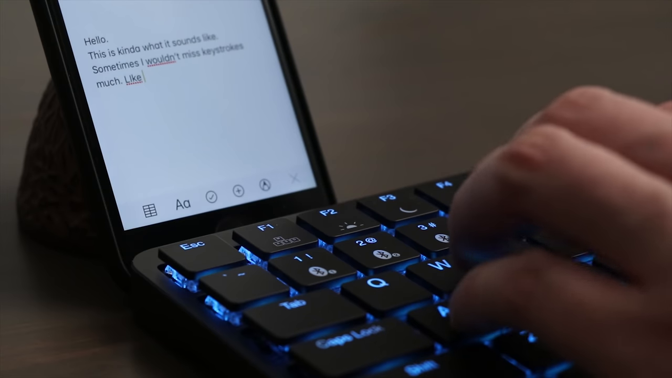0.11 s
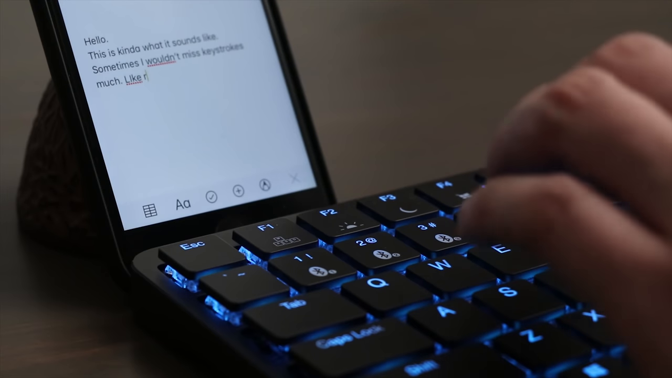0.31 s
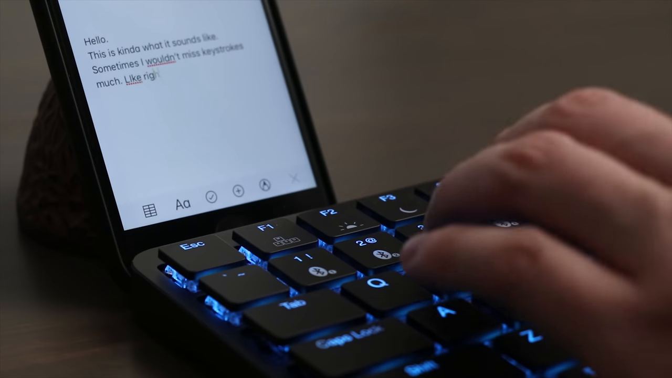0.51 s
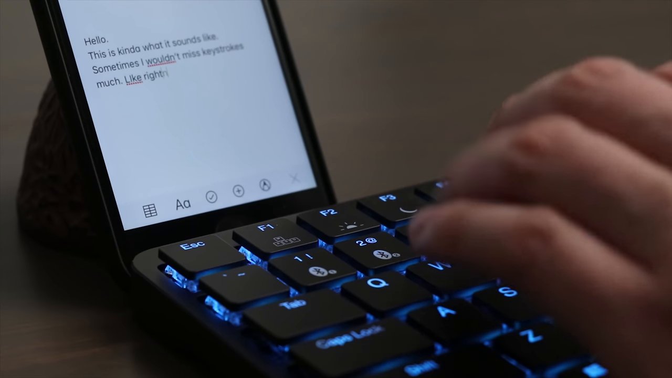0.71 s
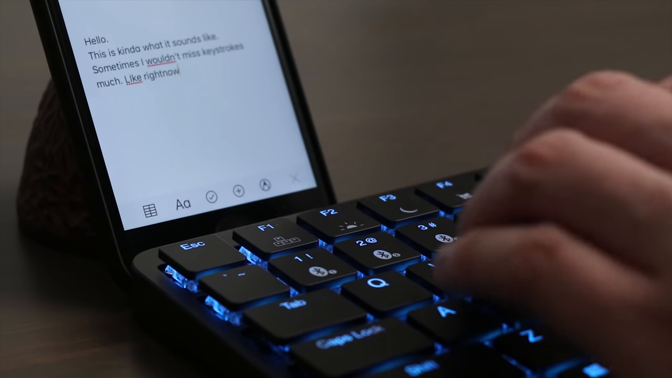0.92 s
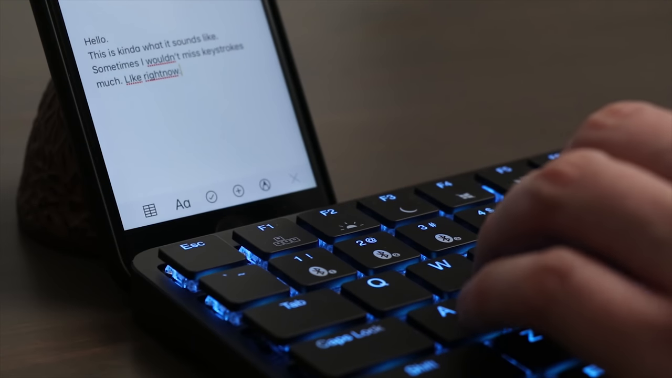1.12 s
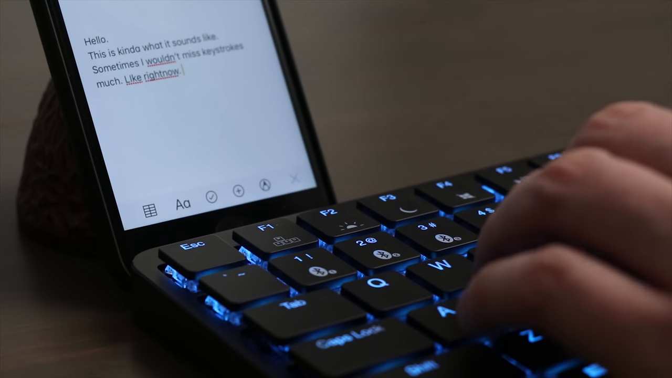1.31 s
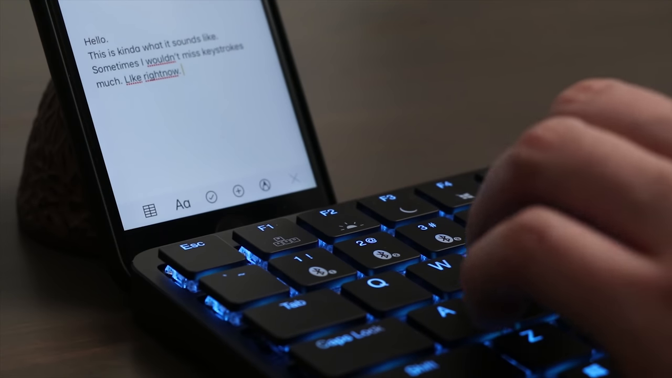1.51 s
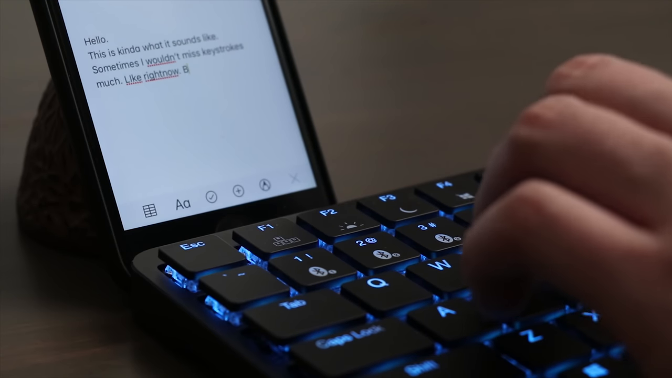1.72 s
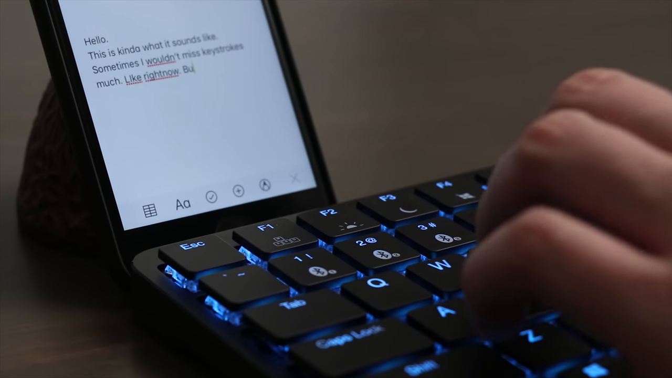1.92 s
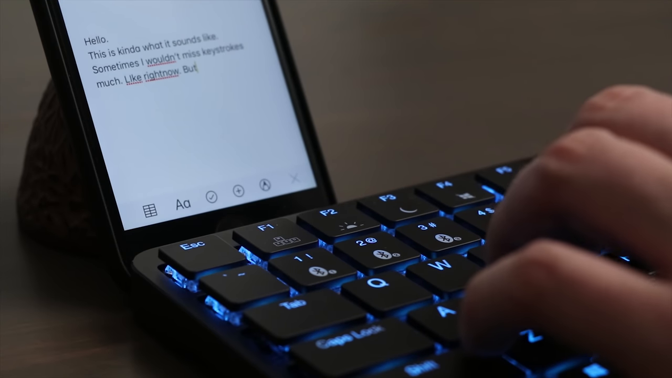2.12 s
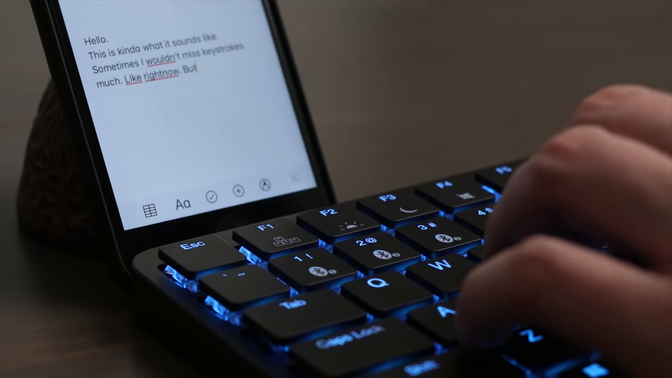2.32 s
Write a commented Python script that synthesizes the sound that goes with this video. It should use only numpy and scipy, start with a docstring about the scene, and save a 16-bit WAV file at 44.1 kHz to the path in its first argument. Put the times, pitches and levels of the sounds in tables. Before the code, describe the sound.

Mechanical keyboard typing up close, a dense burst of bright clicks, a pause, then sparser strokes

```python
"""Two bursts of typing on a clicky keyboard

A small mechanical keyboard stands on a wooden desk, close by in a quiet room. Switches give bright clicks
(shaped noise bursts), mostly followed within milliseconds by a keycap clack and the answer of the case.
Many strokes thump the desk and a few leave a spring ringing faintly: both are made of dying sine waves.
Reflections and a short room tail follow the keys, over a steady hush of rumble, hums and hiss."""
import sys
import numpy as np
from scipy import signal
from scipy.fft import rfft, irfft
from scipy.io import wavfile
from scipy.ndimage import uniform_filter1d

SR = 44100
rng = np.random.default_rng(int(sys.argv[2]) if len(sys.argv) > 2 else 0)


def master(y):
    """Save y as 16-bit WAV."""
    cut = np.clip(np.atleast_2d(y).T, -1, 1)
    pcm = np.round(cut * 32767)  # scale
    wavfile.write(sys.argv[1], SR, pcm.astype(np.int16))


N = 110250  # 2.5 s

# every short burst: its rise, the smoothing of its own spectrum, and the random bumps added to it
ATTACK_MS, GRAIN_HZ, UNEVEN_DB, UNEVEN_HZ = 0.15, 906, 2.5, 452
CAP_WIDTH_HZ, CASE_WIDTH_HZ, CLICK_WIDTH_HZ = 890, 300, 560
CASE_RING_TIMES = 1.86  # the case's decay time, as a multiple of the cap's
RATTLE_DB, RATTLE_AFTER_S, RATTLE_SPREAD_S, RATTLE_DECAY_MS = -22.5, 0.005, 0.013, 0.64
NEAR_T60_S, NEAR_DB, NEAR_DELAY_S, ROOM_DELAY_S = 0.068, -17.5, 0.006, 0.0083
KNOCK_OCTAVES, DESK_RISE_S, DESK_LOW_CUT_HZ = 0.91, 0.0027, 46.4
BOOM_HZ, BOOM_T60_S, BOOM_RISE_S = 78, 0.61, 0.00825
OVERTONE, OVERTONE_DB = 2.4, -21.5  # spring overtone: multiple of the main pitch, and level against it
HUSH_DB, RUMBLE_SIDE_DB, MIC_HISS_DB = -66, -21.5, -79.5
CUTOFF_HZ = 16300


def amp(db):
    """Turns decibels into a gain."""
    return 10 ** (np.asarray(db) / 20)


def read(points, hz):
    """Reads a (frequency, value) table between its points, on a log-frequency axis."""
    point_hz, value = np.transpose(points)
    return np.interp(np.log(hz + 1), np.log(np.abs(point_hz) + 1), value)


def unit(x):
    """Scales to an rms of 1."""
    return x / np.sqrt(np.mean(x ** 2) + 1e-30)


def add(mix, start_s, sound):
    """Mixes a sound in at a time, cutting what runs past the end."""
    part = mix[max(round(start_s * SR), 0):][:len(sound)]
    part += sound[:len(part)]


def bell(hz, centre_hz, width_hz):
    """Gain of a resonance: 1 at its centre, one half a width away."""
    return 1 / (1 + ((hz - centre_hz) / width_hz) ** 2)


def die_away(t, t60_s):
    """A ring loses the same share of its level each moment: 60 dB in t60_s."""
    return np.exp(-np.log(1000) * t / t60_s)


def hush():
    """Low room rumble, faint hums, a thin whine and even hiss, all made of noise shaped by frequency."""
    # background spectrum before scaling to HUSH_DB: pitch_hz, level_db (per Hz)
    hush_spectrum = [(12, -28.5), (20, 10), (86, -12), (127, -6), (204, -6.5), (241, -0.5), (270, -12.5),
                     (357, -10), (485, -15), (590, -16), (1000, -20), (1090, -21), (3740, -24.5),
                     (6180, -25), (16000, -26)]
    # faint steady hums and a thin whine: pitch_hz, width_hz, level_db
    hum_bands = [(185, 8, -78.5), (256, 8, -93.5), (6300, 250, -86.5)]
    hz = np.fft.rfftfreq(N, 1 / SR)

    def noise(shape):
        return unit(irfft(rfft(rng.standard_normal(N)) * shape, N))

    out = amp(HUSH_DB) * noise(amp(read(hush_spectrum, hz)))
    for pitch_hz, width_hz, level_db in hum_bands:
        out += amp(level_db) * noise(bell(hz, pitch_hz, width_hz))
    return out


def impact(parts, decay_ms, size=2048):
    """A hard knock is a dense, fast-dying ring; parts(hz) lists its (dB over 2 ms, spectral shape) pairs."""
    ms = np.arange(size) * 1000 / SR
    hz = abs(np.fft.fftfreq(size, 1 / SR))
    envelope = (1 - np.exp(-ms / ATTACK_MS)) * np.exp(-ms / decay_ms)
    burst = np.fft.fft(rng.standard_normal(size) * envelope)
    grain_bins = max(int(GRAIN_HZ * size / SR), 3)
    own_power = uniform_filter1d(abs(burst) ** 2, grain_bins, mode="wrap")
    bumps = np.interp(hz / UNEVEN_HZ, np.arange(size), rng.standard_normal(size))
    uneven = amp(UNEVEN_DB * bumps)
    power = sum((amp(db) * unit(shape * uneven)) ** 2 for db, shape in parts(hz))
    power = power * 0.002 * SR  # as much energy as 2 ms at the given level
    # a minimum-phase filter gives the burst this spectrum and keeps its start sharp
    log_gain = 0.5 * np.log(power / own_power + 1e-16)
    colour = np.exp(np.conj(signal.hilbert(log_gain)))
    return np.fft.ifft(burst * colour).real


def keycaps():
    """Plastic meets its stop: cap and hard edge sound, the hollow case rings longer, the cap rattles once."""
    # keycap clacks: start_s, cap_db, cap_hz, case_db, case_hz, edge_db, decay_ms
    clack_strokes = [(0.235, -69, 3480, -49, 1480, -72, 2.2), (0.2387, -38.5, 3660, -52, 1520, -52, 2.3),
                     (0.251, -28.5, 3300, -34.5, 1600, -36, 1.8), (0.282, -38.5, 3360, -47, 1640, -62, 1.1),
                     (0.3041, -34, 2710, -44, 1390, -37, 2), (0.3124, -20, 2900, -38, 1270, -25, 1.75),
                     (0.3446, -56, 3260, -47, 1390, -45, 2.1), (0.3895, -40, 3400, -39.5, 1380, -32.5, 4.7),
                     (0.4033, -29, 2800, -40, 1320, -30, 1.46), (0.451, -37, 3300, -51, 1480, -41, 2.1),
                     (0.4672, -37.5, 2860, -47, 1500, -36.5, 2.6),
                     (.4850, -30.5, 2600, -29, 1540, -32, 2.06),
                     (0.5508, -36.5, 2970, -40.5, 1500, -63, 1.2),
                     (0.5584, -31.5, 2800, -42, 1390, -37.5, 2.3),
                     (.6450, -37.5, 2940, -39.5, 1290, -36, 3.1), (0.666, -36, 2970, -35, 1590, -43, 3.7),
                     (0.6851, -39, 3540, -49, 1486, -48, 2.4), (0.6864, -27, 2820, -38, 1430, -30, 3.5),
                     (.7330, -31.5, 3160, -41, 1440, -40, 1.4), (0.7368, -35, 2700, -42, 1520, -43, 6.1),
                     (0.7414, -26, 2820, -38.5, 1380, -32.5, 1.5), (0.8037, -35, 2720, -47, 1490, -48, 3.1),
                     (0.8182, -32.5, 3160, -43, 1570, -38, 1.1),
                     (0.831, -34.5, 3750, -43.5, 1330, -42, 1.6), (0.8739, -26, 2850, -35, 1770, -53, 1.5),
                     (0.88, -57, 2800, -40, 1040, -50, 1.4), (0.9055, -35, 2850, -35.5, 1620, -53, 2.4),
                     (0.9998, -43, 3280, -36, 1600, -31, 2.5), (1.0081, -33.5, 2900, -46, 1370, -38.5, 3),
                     (1.0545, -59, 2970, -50.5, 1370, -53, 2.5), (1.0756, -43, 3300, -32, 1360, -35.5, 1.9),
                     (1.087, -58, 3000, -50, 890, -45, 2.8), (1.114, -32, 3350, -38, 1490, -54, 2.2),
                     (1.1798, -54, 3000, -39, 1370, -45, 2.9),
                     (1.5611, -39.5, 3500, -50.5, 1500, -41.5, 2.8),
                     (1.5799, -44, 2880, -54.5, 1480, -43, 4.4), (1.6452, -41, 2880, -42, 1390, -44, 3.9),
                     (1.6731, -33, 3500, -36, 1780, -36.5, 1.3), (1.7134, -60, 3000, -44, 1720, -39, 1.9),
                     (1.754, -34, 2400, -38, 1500, -36.5, 2.1), (1.7657, -31, 2610, -54, 1390, -37, 0.94),
                     (1.8337, -44, 2500, -52, 1500, -56, 2.5), (1.8449, -27.5, 3270, -30, 1440, -40, 1.7),
                     (1.8945, -36, 2350, -43, 1560, -39, 2), (1.9787, -48, 3040, -44.5, 1232, -56, 3.2)]
    # hard edge, before scaling to edge_db: pitch_hz, level_db (per Hz)
    edge_spectrum = [(100, -6.5), (700, -14), (2000, -12.5), (3500, -1), (4300, -1.5), (5400, -4),
                     (6400, -8.5), (7700, -6.5), (8800, -6), (10200, -17), (12000, -12.5), (15000, -21.5),
                     (17000, -45)]
    # colour that the case gives to every clack: pitch_hz, gain_db
    shell_colour = [(100, -4), (800, 0), (1250, 1.5), (1600, 0), (1850, -3), (2150, 4), (2550, 5),
                    (3000, 1.5), (3400, 2.5), (4200, 2.5), (16000, 0)]
    out = np.zeros(N)

    def ring(hz, centre_hz, width_hz):
        less_bass = np.minimum(hz / centre_hz, 1)
        return bell(hz, centre_hz, width_hz) * less_bass * amp(read(shell_colour, hz))

    for start_s, cap_db, cap_hz, case_db, case_hz, edge_db, decay_ms in clack_strokes:
        def cap(hz):
            edge = amp(read(edge_spectrum, hz) + read(shell_colour, hz))
            return [(cap_db, ring(hz, cap_hz, CAP_WIDTH_HZ)), (edge_db, edge)]

        def case(hz):
            return [(case_db, ring(hz, case_hz, CASE_WIDTH_HZ))]

        add(out, start_s, impact(cap, decay_ms))
        add(out, start_s, impact(case, decay_ms * CASE_RING_TIMES))
        rattle_s = start_s + RATTLE_AFTER_S + RATTLE_SPREAD_S * rng.random()
        add(out, rattle_s, amp(RATTLE_DB) * impact(cap, RATTLE_DECAY_MS))
    return out


def scatter(x):
    """Quick reflections from desk, hands and screen: the sound is smeared by a short dying noise."""
    t = np.arange(SR // 8) / SR
    near = rng.standard_normal(len(t)) * (t > NEAR_DELAY_S) * die_away(t, NEAR_T60_S)
    return amp(NEAR_DB) * signal.fftconvolve(x, near / np.linalg.norm(near))[:N]


def room(x, size=128):
    """The small room stores the energy of each band and gives it back as a diffuse, dying hiss."""
    # how long each pitch lingers: pitch_hz, t60_s (time to fall 60 dB)
    room_decay = [(200, 0.6), (1300, 0.38), (2700, 0.35), (4500, 0.3), (8300, 0.33), (12000, .22),
                  (15000, 0.1)]
    # colour of the tail: pitch_hz, gain_db
    tail_colour = [(200, 9), (1300, -13.5), (2700, -18.5), (4500, -13), (6500, -10.5), (8300, -16.5),
                   (10000, -13.5), (15000, -14)]
    hz, when_s, bands = signal.stft(x, SR, nperseg=size)
    # share of the stored energy left after one time step (twice the rate, as energy is level squared)
    keep = np.exp(-2 * np.log(1000) * when_s[1] / read(room_decay, hz))
    energy = np.array([signal.lfilter([1 - k], [1, -k], abs(band) ** 2) for k, band in zip(keep, bands)])
    noise = signal.stft(rng.standard_normal(N), SR, nperseg=size)[2]
    field = noise / noise.std() * np.sqrt(energy) * amp(read(tail_colour, hz))[:, None]
    out = np.zeros(N)
    add(out, ROOM_DELAY_S, signal.istft(field, SR, nperseg=size)[1])
    return out


def desk():
    """Each thump knocks the desk modes around one pitch and sets its lowest mode booming."""
    # thumps: start_s, knock_db, centre_hz, boom_db
    thump_strokes = [(0.244, -49, 203, -56), (.312, -42, 178, -49.5), (0.39, -45, 435, -61),
                     (0.405, -51, 180, -55), (0.463, -67, 170, -54), (.485, -60, 250, -69),
                     (0.557, -48, 222, -50), (.667, -49, 390, -50), (0.69, -40.5, 235, -55.5),
                     (0.737, -51, 298, -60), (0.814, -52.5, 348, -68.5), (0.829, -44.5, 330, -69),
                     (0.903, -59, 480, -75), (1.001, -42.5, 320, -58.5), (1.012, -46, 220, -58),
                     (1.080, -42, 600, -64), (1.086, -42.5, 313, -58), (1.116, -46.5, 300, -70),
                     (1.179, -67, 276, -68.5), (1.565, -55.5, 200, -61.5), (1.673, -48.5, 410, -62),
                     (1.755, -45, 262, -51.5), (1.80, -60, 380, -66), (1.845, -58, 345, -74),
                     (1.892, -53, 386, -67)]
    # natural pitches of the desk: pitch_hz, level_db (against each other), t60_s
    desk_modes = [(125, -1.5, .13), (158, -2.5, 0.097), (194.4, -2, 0.1), (212, 0, 0.12), (250, -9, 0.11),
                  (305, -7, 0.13), (330, -1.5, 0.09), (408.4, -2.5, 0.091), (474, -5, .1), (520, -11, 0.17),
                  (634, -6.5, .07), (731, 2.5, .06)]
    out, t = np.zeros(N), np.arange(SR // 2) / SR
    hz, db, t60_s = np.transpose(desk_modes)[:, :, None]  # one row per mode
    boom = np.sin(2 * np.pi * BOOM_HZ * t) * die_away(t, BOOM_T60_S)
    boom = np.minimum(t / BOOM_RISE_S, 1) * boom
    for start_s, knock_db, centre_hz, boom_db in thump_strokes:
        weight = amp(db) * bell(np.log2(hz), np.log2(centre_hz), KNOCK_OCTAVES)
        modes = np.sin(2 * np.pi * (hz * t + rng.random(hz.shape))) * die_away(t, t60_s)
        knock = (weight * modes).sum(0) / np.linalg.norm(weight)
        knock = np.minimum(t / DESK_RISE_S, 1) * knock
        add(out, start_s, amp(knock_db) * knock + amp(boom_db) * boom)
    low_cut = signal.butter(2, DESK_LOW_CUT_HZ, "high", fs=SR, output="sos")
    return signal.sosfilt(low_cut, out)


def switches():
    """The click leaf snaps: a ring near 8 kHz, a treble splash and a little of the stem."""
    # switch clicks: start_s, ring_db, ring_hz, stem_db, treble_db, decay_ms
    click_strokes = [(0.2459, -28.5, 8470, -40.5, -34, 1.6), (0.309, -27, 8400, -37.5, -35.5, .8),
                     (.3869, -47, 9000, -48, -37.5, 1.3), (0.3993, -34, 7200, -34.5, -38, 0.7),
                     (0.4617, -32, 7750, -41, -36.5, 0.59), (.4834, -31.5, 7720, -37.5, -36, 2.7),
                     (0.5466, -37, 8000, -40.5, -40, 1), (0.5561, -38.5, 8700, -39.5, -35, 0.75),
                     (.6410, -35, 8430, -50, -35, 0.61), (0.6804, -34.5, 7860, -46, -38.5, 0.85),
                     (.7380, -80, 8400, -34, -38.5, 0.67), (0.8002, -31.5, 8370, -47, -39.5, 0.45),
                     (0.8274, -33, 8530, -37, -34.5, 1.2), (0.8706, -33.5, 8200, -35, -40.5, 2.6),
                     (0.903, -31.5, 8130, -39, -37.5, 1.7), (1.0054, -31, 8520, -34.5, -39, 0.58),
                     (1.0704, -37, 7860, -39, -41.5, 1.6), (1.0768, -34.5, 8600, -37.5, -43, 0.58),
                     (1.1116, -35, 8180, -47, -37, 1.3), (1.1768, -40, 8340, -42, -40, 1.7),
                     (1.1795, -42.5, 8160, -51, -52, 3.1), (1.5712, -34.5, 8500, -39.5, -37.5, 1.1),
                     (1.5776, -56, 8400, -57, -54, 1), (1.6418, -39.5, 8500, -43, -37, 0.61),
                     (1.7613, -37.5, 7840, -37.5, -37, 0.61), (1.8413, -37.5, 8000, -46, -40, 1.7),
                     (1.8876, -34, 8550, -38, -35.5, 0.82), (1.9741, -32.5, 8320, -45.5, -35.5, 0.9)]
    # stem, before scaling to stem_db: pitch_hz, level_db (per Hz)
    stem_spectrum = [(100, -18.5), (1000, -9.5), (1900, -8), (2700, -10.5), (3600, 3.5), (5300, -5.5),
                     (6200, -5), (8000, -31), (16000, -50)]
    # treble splash, before scaling to treble_db: pitch_hz, level_db (per Hz)
    treble_spectrum = [(100, -47), (7000, -48), (10000, -11.5), (11000, -5), (12500, -2), (14200, -2.5),
                       (15500, -14.5), (17000, -20)]
    out = np.zeros(N)
    for start_s, ring_db, ring_hz, stem_db, treble_db, decay_ms in click_strokes:
        def click(hz):
            return [(ring_db, bell(hz, ring_hz, CLICK_WIDTH_HZ)),
                    (stem_db, amp(read(stem_spectrum, hz))),
                    (treble_db, amp(read(treble_spectrum, hz)))]

        add(out, start_s, impact(click, decay_ms))
    return out


def springs():
    """A spring rings on after the stroke as a dying sine wave with one weak overtone."""
    # spring pings: start_s, level_db, pitch_hz, t60_s
    spring_pings = [(0.315, -55, 980, 0.32), (.686, -55, 980, .3), (0.904, -62, 950, 0.34),
                    (1.182, -53, 1240, 0.16), (1.846, -58.5, 959, 0.68), (1.980, -61.5, 959, 0.8),
                    (1.975, -61, 3480, 0.17)]
    out, t = np.zeros(N), np.arange(SR) / SR
    for start_s, level_db, pitch_hz, t60_s in spring_pings:
        main = np.sin(2 * np.pi * pitch_hz * t)
        overtone = amp(OVERTONE_DB) * np.sin(2 * np.pi * OVERTONE * pitch_hz * t)
        add(out, start_s, amp(level_db) * (main + overtone) * die_away(t, t60_s))
    return out


def scene():
    """The keyboard sits dead centre; only the background has a trace of width."""
    keys = switches() + keycaps()
    mid = keys + scatter(keys) + room(keys) + desk() + springs() + hush()
    side = amp(RUMBLE_SIDE_DB) * hush() + amp(MIC_HISS_DB) * rng.standard_normal(N)
    return np.array([mid + side, mid - side])  # left, right


def record(dry):
    """The recorder's band limit: a steep filter takes away the highest treble."""
    low_pass = signal.firwin(201, CUTOFF_HZ, window=("kaiser", 8), fs=SR)
    return signal.oaconvolve(dry, low_pass[None], "same")


dry = scene()
out = record(dry)
master(out)
```